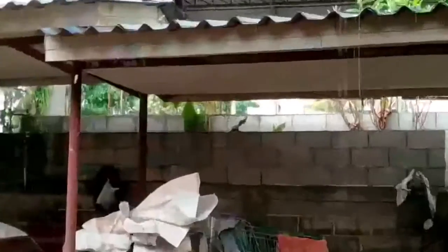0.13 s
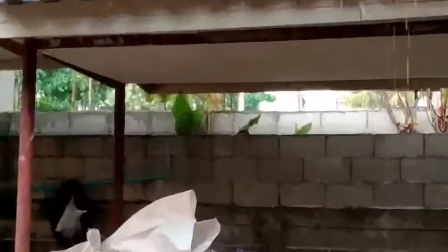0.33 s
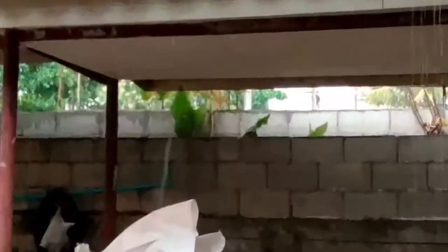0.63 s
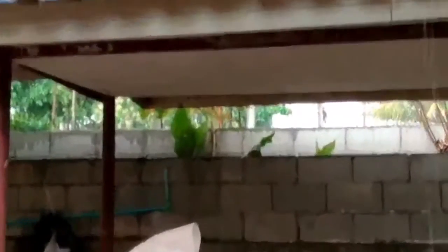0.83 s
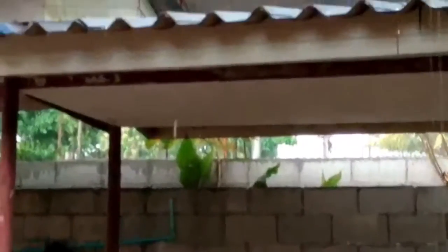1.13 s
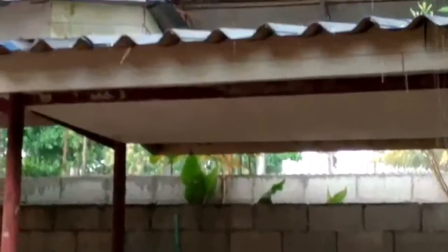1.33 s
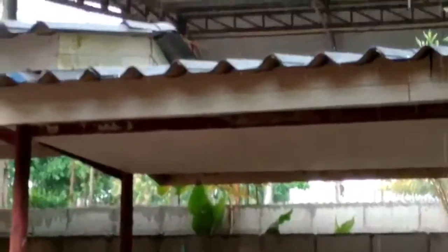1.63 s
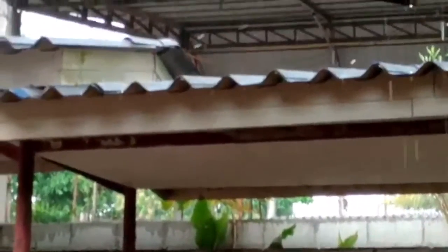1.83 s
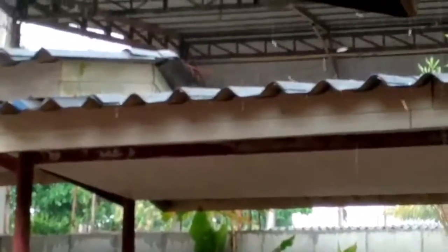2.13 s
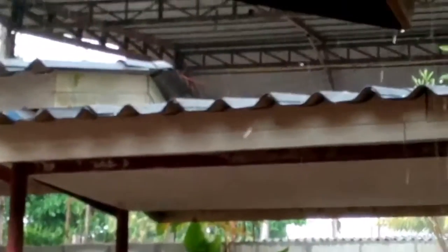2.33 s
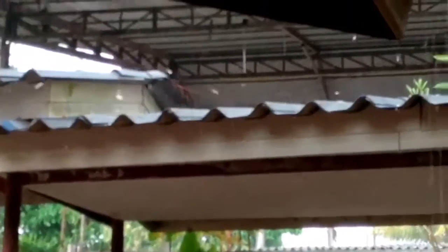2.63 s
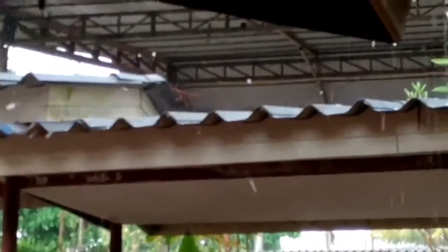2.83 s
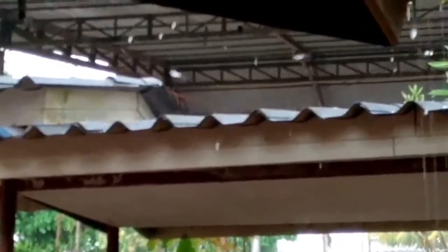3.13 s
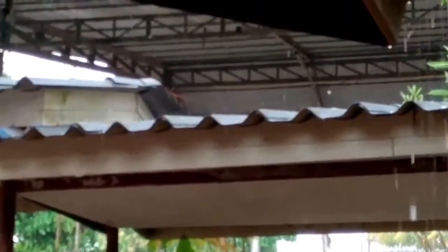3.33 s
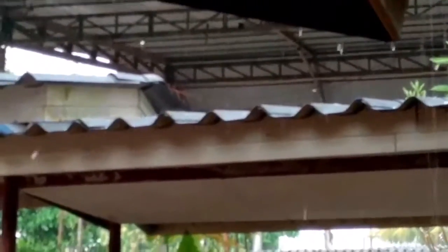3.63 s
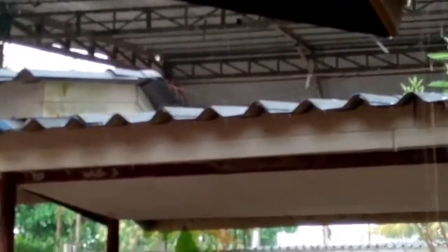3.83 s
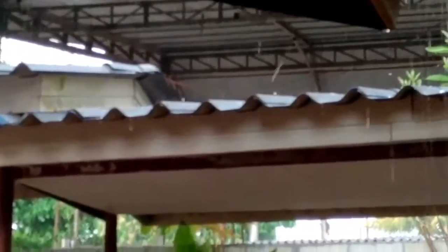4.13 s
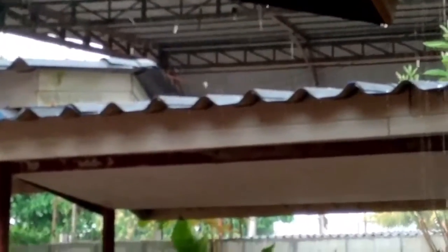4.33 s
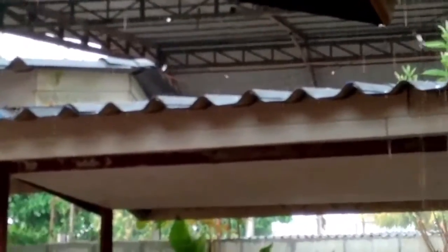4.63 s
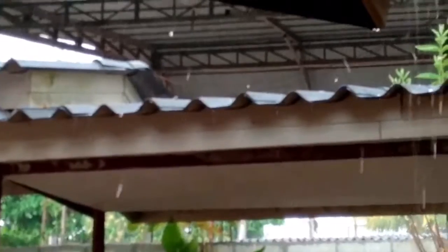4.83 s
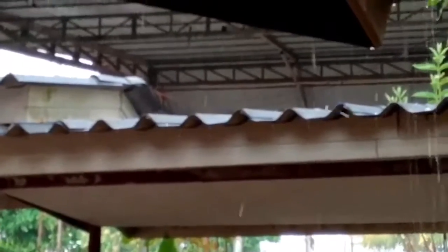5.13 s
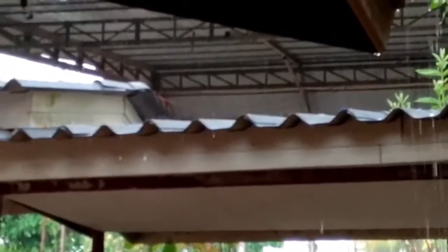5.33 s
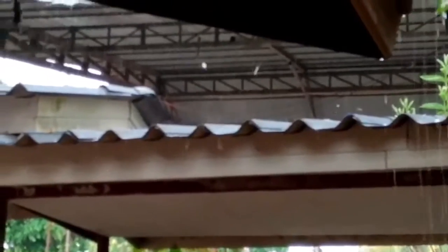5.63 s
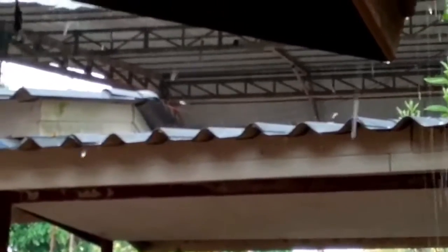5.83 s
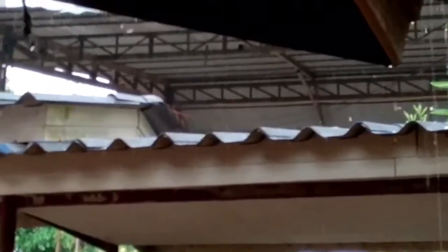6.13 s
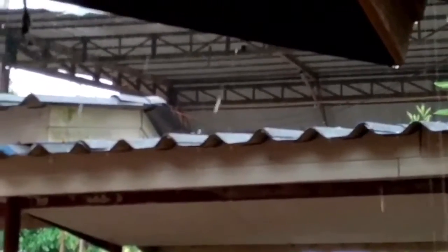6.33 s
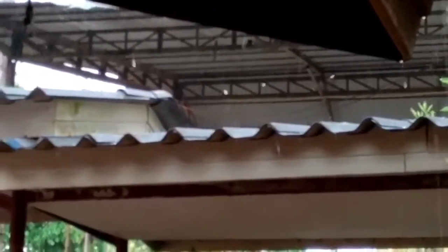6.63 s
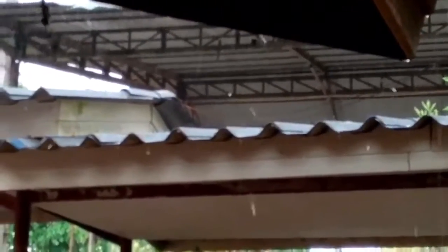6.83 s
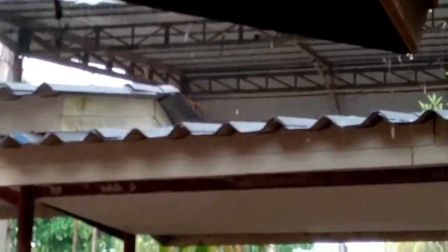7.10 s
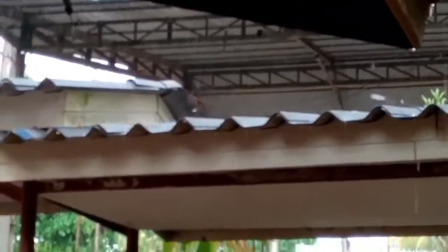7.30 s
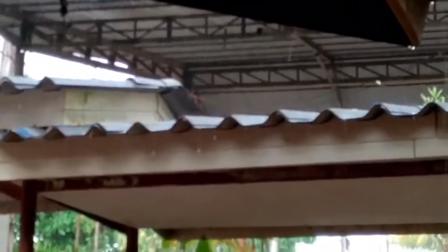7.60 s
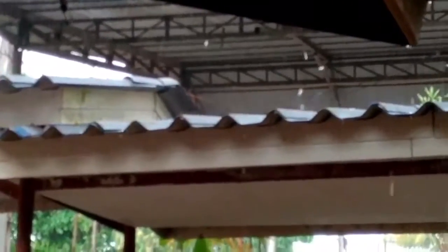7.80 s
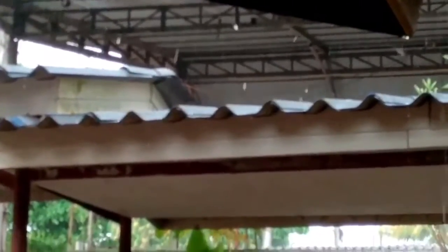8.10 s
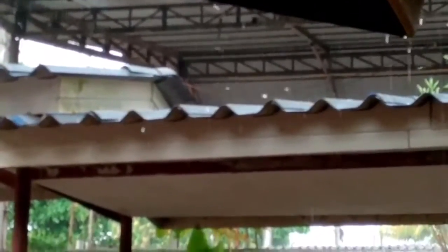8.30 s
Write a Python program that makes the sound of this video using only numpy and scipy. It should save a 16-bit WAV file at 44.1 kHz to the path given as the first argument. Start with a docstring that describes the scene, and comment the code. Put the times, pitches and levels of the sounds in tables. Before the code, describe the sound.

Hail and rain drum steadily on corrugated roofing sheets around an open shelter. A dense, flickering roar runs throughout, filled with tiny dry ticks and short pings. Nearer stones strike irregularly several times a second with hard mid-pitched raps and bright icy cracks, while heavier ones thud dully overhead. The microphone is under the roof, wide stereo, with no deep bass and slightly softened top.

```python
"""An open shelter among corrugated sheet roofs, in hail and rain.
Countless far stones and drops merge into a flickering roar: bands of noise stirred by random blows.
Small stones ping, tick and tonk on patches of sheet, whose panels also hum: struck or shaken resonances.
Near stones give raps and icy cracks, each a short tick and a dying wash of noise round one pitch.
The heaviest land overhead with a dull thud: a push of air, its echoes and a short boom."""
import sys
import numpy as np
from scipy import signal
from scipy.io import wavfile

SR = 44100
rng = np.random.default_rng(int(sys.argv[2]) if len(sys.argv) > 2 else 0)


def wav_out(sig):
    """Save sig, one row per channel (or a flat mono array), as 16-bit PCM at SR to the path in sys.argv[1]."""
    wavfile.write(sys.argv[1], SR, np.round(np.clip(np.atleast_2d(sig).T, -1, 1) * 32767).astype(np.int16))


N = 373086

# How the downpour swells and sags: t/s, base level/dB, treble lift/dB
DOWNPOUR = [(0.0, -25.5, 4.5), (0.2, -23, 1.5), (0.33, -26, 3.5), (0.4, -22.5, 2), (0.62, -25.5, 3),
            (0.88, -25, 0.5), (0.96, -25.5, 2.5), (1.25, -22, -1), (1.62, -24.5, 3.5), (1.71, -28, 2),
            (1.75, -20.5, 1.5), (1.85, -25, 6), (2.08, -23, 0.5), (2.24, -28, 2.5), (2.29, -23.5, 3),
            (2.8, -24, 0.5), (2.949, -21.5, -4.5), (3.32, -25, 3.5), (3.7, -24, 1.5), (4.41, -24.5, 2.5),
            (4.68, -23.5, 3), (5.02, -24.5, 2.5), (5.86, -24.5, 2), (6.25, -22, -1), (6.49, -25, -3),
            (6.55, -23, 0), (7.0, -24.5, 2.5), (7.17, -23, 2.5), (7.8, -24.5, 2.5), (7.86, -19.5, 6),
            (8.04, -24, 4.5), (8.1, -22.5, 0), (8.46, -23.5, 5.5)]
# Tone colour of the rain on the far sheets: f/Hz, relative level per Hz/dB
ROAR_COLOUR = [(28, -40), (50, -23), (110, -8.5), (170, -8), (400, -7.5), (580, -5.5), (770, -6), (1400, 1),
               (2200, -0.5), (2700, -5.5), (3400, -3.5), (4500, -12.5), (6300, -12), (8000, -11),
               (10000, -26.5)]
# How alike the roar is on the left and right: f/Hz, likeness (1 = same, 0 = unrelated, below 0 = opposed)
LEFT_RIGHT_LIKENESS = [(40, .86), (120, 1), (300, 0.93), (700, 0.8), (1400, -0.17), (3000, 0.11),
                       (8000, 0.034)]
# Which side the roar leans to: f/Hz, left minus right/dB
LEFT_RIGHT_LEAN = [(100, 0.5), (700, 0), (1400, 1.5), (2800, 0.5), (5500, -7), (9000, -0.5)]
# Heavy stones overhead, and the low body of the hard rap at 2.488 s: t/s, push level/dB, push f/Hz, boom
# level/dB, boom f/Hz, # clear note against noisy boom/dB, boom t60/s (t60 = time to fall by 60 dB)
HEAVY_STONES = [(1.0655, -1, 960, -21, 205, -12, .2), (1.204, -23, 800, -19, 610, -3, .16),
                (1.3307, -10.5, 710, -23, 455, -8, .14), (1.787, -16, 600, -21, 332, -6, .16),
                (1.797, -23, 700, -20, 594, -4, 0.18), (2.0905, -14, 450, -19.5, 264, 7, 0.09),
                (2.4884, -11, 1500, -28, 800, -5, .06), (2.605, -30, 700, -26, 438, -5, 0.18),
                (2.882, -26, 600, -27, 350, 0, .16), (3.562, -22, 600, -23.5, 457, 9, .2),
                (3.754, -20, 800, -23, 800, -5, 0.18), (4.5136, -8.5, 900, -22, 280, 0, .14),
                (4.6784, -10, 610, -18.5, 263, 1, 0.11), (5.207, -16, 800, -27, 397, -10, .16),
                (5.443, -26, 700, -21, 560, -7, 0.16), (5.455, -28, 600, -26, 372, 0, .1),
                (6.1945, -24, 620, -14, 385, 4, 0.067), (6.561, -23, 800, -24, 724, 1, 0.2),
                (6.8512, -7.5, 1000, -21, 497, -4, 0.088), (6.9185, -11, 890, -22, 480, 3, .06),
                (7.621, -13.5, 700, -26, 384, 0, .16), (7.834, -32, 700, -22.5, 517, 6, 0.18),
                (8.066, -12.5, 810, -28, 835, -5, 0.14)]
# Stones rapping the sheet, plus a few crisp high ticks of cracking ice: t/s, level/dB, ring f/Hz, left minus
# right/dB, ring t60/s, # tick against that level/dB, narrow ring over broad wash/dB
RAPPING_STONES = [(0.118, -9, 1450, 3, 0.15, -15.5, -6), (0.215, -10, 2250, 4, 0.23, -8, 10),
                  (0.402, -9, 1806, -9, .24, -10, 15), (0.502, -19, 1790, -2, 0.22, -2, 0),
                  (0.604, -8, 1344, -4, 0.16, -12, -4), (0.641, -10.5, 2040, 0, 0.69, -9, 3),
                  (0.721, -8, 1770, 0, 0.35, -9, -3), (1.1274, -21, 1770, 1, 0.22, -6, 0),
                  (1.2057, -5.5, 1110, 2, 0.19, -7, 0), (1.314, -11, 1510, -4, 0.2, -6, -9),
                  (1.397, -15, 1720, -5, 0.28, -5, -1), (1.7434, -13, 1330, 0, 0.4, -5, 4),
                  (1.758, -14, 2400, 0, .2, -7, 2), (1.7897, -14, 1800, 5, .15, 3, -4),
                  (1.8108, -9, 2180, -3, 0.18, -6, 0), (1.8109, -13, 4960, -2, .05, 7, 0),
                  (1.8198, -8.5, 1280, 2, 0.36, -6, -8), (1.8385, -22, 1700, 6, 0.16, 0, -2),
                  (1.887, -16, 2190, -1, .2, -4, 2), (2.352, -12, 1900, 3, 0.33, -10, 3),
                  (2.4525, -10, 1980, 2, 0.15, -3, 0), (2.4795, -20, 1790, 0, .08, -4, 5),
                  (2.4884, -3, 1590, 1, 0.12, 0.5, -2), (2.4935, -12, 2100, -2, 0.11, -5, -2),
                  (2.5025, -10, 1800, 0, .08, 0, 0), (2.5358, -13.5, 1820, -4, 0.6, -3, -2),
                  (2.6046, -11, 945, -1, 0.26, -7, 11), (2.689, -11, 1350, 6, 0.28, -6, -11),
                  (2.8665, -18, 1680, 0, 0.23, -1, 0), (2.8835, -9, 1660, 1, 0.35, -10, 0),
                  (2.9208, -11.5, 2120, -1, 0.63, -8, -12), (3.03, -10, 2110, 0, 0.11, 1, -11),
                  (3.14, -6, 1200, 0, 0.21, -3, 5), (3.221, -12, 1380, 1, 0.38, -8, -5),
                  (3.5045, -15, 2730, -3, .2, -6, 3), (3.5585, -15, 5600, -6, .08, -2, 0),
                  (3.559, -6.5, 1980, -5, 0.1, -4, 0), (3.6394, -11.5, 2020, 0, 0.38, -12, -16),
                  (3.7443, -12.5, 1240, 4, 0.58, -14, -10), (3.779, -15, 1380, 1, 0.49, -5, 1),
                  (3.805, -10.5, 2130, -1, 0.22, -2, 10), (4.11, -10, 1700, -2, 0.68, -9, 5),
                  (4.2718, -14, 6250, 1, .04, -1, 6), (4.2718, -6, 3120, -4, 0.074, -3, 3),
                  (4.2765, -6, 3700, -2, 0.066, -7, 4), (4.5847, -11, 2030, -1, 0.25, -2, 0),
                  (4.6275, -8, 1855, -1.5, 0.72, 2.5, 3), (4.7168, -12.5, 1750, 1, .24, -6, -2),
                  (4.769, -13, 2160, 3, 0.67, -6, 1), (4.9167, -7.5, 1620, 1, 0.25, -3, 0),
                  (4.9578, -26, 1530, -3, 0.18, -7, 4), (5.07, -10.5, 1390, 0, 0.33, -8, -10),
                  (5.2129, -7.5, 1700, 2, 0.3, -9, 4), (5.32, -13.5, 2270, 5, 0.29, -8, 1),
                  (5.449, -14, 1510, 0, 0.12, -9, 2), (5.4946, -11.5, 1380, 4, 0.31, -1, -2),
                  (5.5488, -10, 1200, 1, 0.29, -7, -11), (5.589, -6, 1340, -3, .1, -6, -2),
                  (5.5938, -3, 1284, -1, 0.12, -8, 9), (5.595, -14, 2400, 0, .1, -6, 4),
                  (5.7305, -11, 1150, 4, 0.29, -5, -5), (5.892, -12, 1700, 4, 0.81, -3, -1),
                  (5.971, -10, 1350, 2, 0.27, -7, 3), (6.0325, -9, 1790, 2, 0.4, -11, 10),
                  (6.0832, -14, 1300, 3, 0.31, -2, 0), (6.1389, -11, 1470, 5, 0.39, -7, -2),
                  (6.2246, -14.5, 1750, 4, .24, -1, 1), (6.3001, -15.5, 990, 0, 0.6, -10, -16),
                  (6.558, -14, 1380, 6, 0.17, -10, 3), (6.5974, -9, 865, 0, 0.2, -8, 1),
                  (6.677, -10.5, 1440, 2, 0.41, -9, -15), (6.72, -19, 1490, 1, .25, -5, 0),
                  (6.748, -13, 1290, 2, 0.14, 3, -2), (6.869, -10, 1950, 2, .12, -4, 3),
                  (7.0407, -17, 2600, 5, 0.23, -6, 4), (7.095, -12, 1350, 5, .25, -8, -1),
                  (7.1465, -4, 1630, 0, 0.18, -13, -5), (7.18, -22, 1810, 3, 0.15, -5, 2),
                  (7.228, -18, 1280, 4, 0.2, -6, 7), (7.3055, -16, 1720, 6, 0.16, 0, 0),
                  (7.3647, -13, 2240, 4, 0.21, -8, 2), (7.4759, -8.5, 1850, 2, 0.58, -10, 2),
                  (7.5991, -6.5, 1350, 4, 0.33, -10, -5), (7.6205, -16, 1700, 4, 0.17, -4, 1),
                  (7.8305, -13, 2500, -3, 0.091, -8, 8), (7.835, 0, 2620, -3, 0.11, -12, 11),
                  (7.842, -5, 2700, -5, .1, -14, 7), (7.8375, -7.5, 1145, -1, 0.41, -7, 15),
                  (7.884, -24, 1800, 5, 0.18, -5, 2), (7.9353, -8, 1786, 3, 0.53, -10, 4),
                  (8.0635, -8, 1020, -0.5, 0.33, -12, -8)]
# Ice shattering on the sheet: t/s, level/dB, ring f/Hz, left minus right/dB, ring t60/s,
# narrow ring over broad wash/dB
SHATTERING_ICE = [(0.041, -16, 6240, -3.0, 0.27, 12), (0.1108, -15.5, 5970, -3, 0.26, 5),
                  (0.212, -9.5, 6600, -4.0, 0.2, -13), (0.415, -18.5, 6660, -3, 0.85, 9),
                  (0.4785, -14, 4510, -2, 0.19, -4), (0.7555, -14, 4140, -2, 0.31, -6),
                  (0.9948, -13.5, 3800, -2, 0.19, 13), (1.1222, -20.5, 3990, -4, 0.91, -3),
                  (1.301, -17, 6100, -3.0, 0.52, 12), (1.5728, -19, 5500, -1, 0.32, 11),
                  (1.7552, -20.5, 3840, -3, 0.94, -13), (1.8106, -10.5, 5430, -2, 0.18, 6),
                  (2.055, -20, 4280, -5, 0.52, -10), (2.333, -18, 3500, -3.5, 0.28, -8),
                  (2.4524, -17, 3400, -5, 0.26, 7), (2.6616, -13.5, 3950, -3, 0.39, -2),
                  (2.8307, -15.5, 4100, -3, 0.89, 5), (2.876, -15, 5440, 1, 0.4, -6),
                  (2.8953, -13, 5440, -5, 0.22, 2), (2.99, -12, 5840, -6, 0.45, 17),
                  (3.4147, -18, 3580, -4, 0.17, -9), (3.556, -14, 4700, -4, .1, 8),
                  (3.559, -8.5, 5500, -5, 0.11, 17), (3.5645, -14.5, 5270, -4, 0.18, 5),
                  (3.6914, -14.5, 3830, -4, 0.28, -18), (4.077, -14, 6700, -1, 0.24, 8),
                  (4.2716, -7, 6300, 0, .04, 3), (4.276, -14, 6100, -2, 0.067, 3),
                  (4.466, -24, 3430, 1, 0.36, -4), (4.645, -17.5, 5000, -2, 0.33, -4),
                  (5.0569, -18, 3400, -2, 0.67, 3), (5.312, -19.5, 3660, -3, 0.4, 4),
                  (5.441, -19, 5140, -5, 0.17, 7), (5.5928, -15, 3910, -1, 0.25, -4),
                  (6.1518, -21.5, 3490, -2, 0.87, -6), (6.206, -14.5, 6240, -1, 0.87, 7),
                  (6.294, -18.5, 3940, -3, 0.42, -11), (6.7, -20, 3530, -1.5, 0.93, 0),
                  (7.0258, -18, 3600, 0, 0.57, 4), (7.148, -12.5, 3700, 1, 0.31, -2),
                  (7.179, -15, 3610, -1.5, 0.13, -5), (7.439, -17, 3880, -2, 0.94, -19),
                  (7.488, -22, 3500, -2.0, 0.32, -2), (7.615, -12, 3320, -2, 0.28, -11),
                  (8.062, -11, 4600, 0, 0.55, -5), (8.386, -16, 5950, -1, 0.83, 13)]
# Echoes of a push from beams, ground and walls: delay/s, typical level against the push/dB, sign
PUSH_ECHOES = [(.0098, -9, -1), (.0116, -8, -1), (.0300, -11, 1), (.0430, -13, 1)]
# Panel modes, kept humming by the rain: f/Hz, hum level/dB, t60/s
PANEL_MODES = [(105.8, -53.5, 0.15), (205, -53, 0.14), (348.4, -62, 0.34), (1305, -49.5, 0.07)]

BOOM_RISE_S, PUSH_SPREAD_PER_S = .003, 380
NOTE_EXTRA_T60_S = .2   # the note's own fall, on top of the fall of the whole wash
TICK_WIDTH = .45   # first tick filter's width, as a share of the wash width
CRACK_TICK_DB, CRACK_RISE_S = -2, .001   # the same for every crack
DENSITY_FOLLOWS = 1.5   # stones come thicker as the downpour swells: dB of rate per dB of level
MIC_LOW_HZ, MIC_TOP_HZ, CUTOFF_HZ = 42, 9200, 10280
LEFT_RIGHT = np.array([[1], [-1]])   # plus on the left, minus on the right


def from_db(db):
    """Turns decibels into gain."""
    return 10 ** (np.asarray(db) / 20)


def rms_one(x):
    """Scales a sound to an average (rms) strength of 1."""
    return x / np.sqrt(np.mean(x ** 2) + 1e-20)


def at_hz(points, hz):
    """Reads a table at any pitch, on a log-frequency axis."""
    table_hz, values = np.array(points).T
    return np.interp(np.log(hz), np.log(table_hz), values)


def resonance(x, hz, width_hz):
    """Two-pole filter that favours one pitch, with a gain of about 1 at its top."""
    r = np.exp(-np.pi * width_hz / SR)
    top_gain = (1 - r * r) / 2
    poles = [1, -2 * r * np.cos(2 * np.pi * hz / SR), r * r]
    return signal.lfilter(top_gain * np.array([1, 0, -1]), poles, x)


def ring(clicks, hz, t60):
    """Each unit click starts a sine of height 1 that dies away, like one mode of a struck sheet."""
    r = from_db(-60 / (t60 * SR))
    w = 2 * np.pi * hz / SR
    return signal.lfilter([0, np.sin(w)], [1, -2 * r * np.cos(w), r * r], clicks + 1e-18)


def add(out, s, sound):
    """Mixes a stereo sound in at s seconds."""
    i = round(s * SR)
    out[:, i:i + sound.shape[1]] += sound[:, :N - i]


def downpour():
    """Base level and treble lift in dB, sample by sample, on straight lines between table points."""
    s, *columns = np.transpose(DOWNPOUR)
    return [np.interp(np.arange(N) / SR, s, column) for column in columns]


def blows(per_s, spread_db, t60):
    """Power of random blows of uneven size, each dying away; scaled to a mean of 1."""
    run_in = SR // 2   # blows before the start are already dying away at t = 0
    sizes = from_db(2 * spread_db * np.minimum(rng.exponential(1, N + run_in), 4))
    struck = sizes * (rng.random(N + run_in) < per_s / SR)
    fall_per_sample = from_db(-120 / (t60 * SR))   # doubled dB, since this is power
    power = signal.lfilter([1], [1, -fall_per_sample], struck)[run_in:]
    return power / power.mean()


def roar(per_s, spread_db, t60, shared, common, wash):
    """Far sheets: many impacts blur into noise bands, stirred by own and shared blows over a smooth wash."""
    level_db, treble_db = downpour()
    edges = 25 * 2 ** (np.arange(28) / 3)   # third-octave bands, in Hz
    white = rng.standard_normal((2, 2, N))
    group_blows = [blows(per_s, spread_db, t60) for _ in range(3)]
    own_blows = blows(per_s, spread_db, t60)
    common_blows = blows(per_s, spread_db, t60)
    out = 0
    for k, (low, high) in enumerate(zip(edges, edges[1:])):
        band_filter = signal.butter(2, [low, high], "band", fs=SR, output="sos")
        mid, side = signal.sosfilt(band_filter, white[k % 2])
        hz = np.sqrt(low * high)
        # mixing mid and side sets how alike left and right are
        alike = np.clip(at_hz(LEFT_RIGHT_LIKENESS, hz), -.99, .99)
        band = np.sqrt(1 + alike) * mid + np.sqrt(1 - alike) * side * LEFT_RIGHT
        # four neighbouring bands share a group; each band reads the own blows at another time
        group = group_blows[k // 4 % 3]
        own = np.roll(own_blows, k * N // 27)
        stirred = np.sqrt(wash + common * common_blows + shared * group + own)
        # the treble lift starts above 2400 Hz and is full an octave higher
        colour_db = treble_db * np.clip(np.log2(hz / 2400), 0, 1)
        lean = from_db(at_hz(LEFT_RIGHT_LEAN, hz) / 2 * LEFT_RIGHT)
        out = out + from_db(at_hz(ROAR_COLOUR, hz) + colour_db) * stirred * lean * band
    return from_db(level_db) * rms_one(out)


def patter(per_s, spread_db, cycles, low_hz, high_hz, level_db, across, count):
    """Small stones, each setting one patch of sheet ringing; cycles is how many waves a 60 dB fall takes."""
    pour_db = downpour()[0]
    thick = from_db(DENSITY_FOLLOWS * (pour_db - pour_db.mean()))
    sizes = from_db(spread_db * np.minimum(rng.exponential(1, N), 4)) * rng.choice([-1, 1], N)
    hits = rng.random(N) < per_s * thick / SR
    struck = sizes * hits / np.sqrt(thick)   # the level is applied at the end
    patch = rng.integers(0, count, N)
    out = np.zeros((2, N))
    for k, hz in enumerate(np.geomspace(low_hz, high_hz, count)):
        ping = rms_one(ring(struck * (patch == k), hz, cycles / hz))
        ping = ping * from_db(at_hz(ROAR_COLOUR, hz)) * np.sqrt(hz)
        # patches take turns on the left and right, and reach the other side slightly shifted
        out[k % 2] += ping
        out[1 - k % 2] += across * np.roll(ping, rng.integers(-20, 20))
    return from_db(level_db + pour_db) * rms_one(out)


def hum():
    """Steady random shaking never lets the panel modes come to rest."""
    shaking = rng.standard_normal((len(PANEL_MODES), N))
    return sum(from_db(db) * rms_one(ring(x, hz, t60))
               for x, (hz, db, t60) in zip(shaking, PANEL_MODES))


def stones(table, rise_s, narrow, wide, first_t60, tail_db, note_db, wash_db):
    """A tick, then the sheet's crowded modes as dying noise: a quick first fall and a longer tail."""
    out, t = np.zeros((2, N)), np.arange(SR // 3) / SR
    for s, db, hz, pan_db, t60, tick_db, focus_db in table:
        noise = rng.standard_normal((2, len(t)))
        # the mode nearest the blow sounds as a note
        note_sine = np.sin(2 * np.pi * (hz * t + rng.random((2, 1))))
        note = from_db(note_db + focus_db - 60 * t / NOTE_EXTRA_T60_S) * note_sine
        narrow_ring = note + rms_one(resonance(noise, hz, narrow * hz))
        focused = from_db(focus_db) * narrow_ring / np.hypot(1, from_db(note_db + focus_db))
        broad = rms_one(resonance(resonance(noise, hz, wide * hz), hz, 2 * wide * hz))
        wash = (focused + broad) / (1 + from_db(focus_db))
        tail = from_db(tail_db - 60 * t / np.clip(t60, .03, .8))
        shape = (from_db(-60 * t / first_t60) + tail) * (1 - np.exp(-t / rise_s))
        # the tick is one click through two broad resonances
        click = resonance(1.0 * (t == 0), hz, TICK_WIDTH * wide * hz)
        tick = resonance(click, hz, 1.1 * wide * hz)
        sound = from_db(wash_db) * wash * shape + from_db(tick_db) * tick / np.abs(tick).max()
        add(out, s, from_db(db + pan_db / 2 * LEFT_RIGHT) * sound)
    return out


def cracks():
    """Shattering ice: a fast start excites high, broadly spread sheet modes."""
    table = [(*row, CRACK_TICK_DB, focus_db) for *row, focus_db in SHATTERING_ICE]
    return stones(table, rise_s=CRACK_RISE_S, narrow=0.27, wide=1.43, first_t60=0.0049,
                  tail_db=6.5, note_db=-16.0, wash_db=-11)


def raps():
    """Near stones: a softer start and narrower resonances make the sheet's pitch clearer."""
    return stones(RAPPING_STONES, rise_s=0.0027, narrow=0.091, wide=1.0, first_t60=0.0034,
                  tail_db=4.5, note_db=-1.5, wash_db=-12.0)


def thuds(damping, narrow, wide_db, side_db, panel_db):
    """The dented panel pushes and pulls the air, with echoes, and its low modes boom on."""
    out, t = np.zeros((2, N)), np.arange(SR // 4) / SR
    for s, push_db, hz, boom_db, boom_hz, note_db, boom_t60 in HEAVY_STONES:
        # the bending wave spreads: highs come first, lows trail
        push = np.sin(2 * np.pi * hz * t / (1 + PUSH_SPREAD_PER_S * t)) * np.exp(-damping * hz * t)
        noise = rng.standard_normal((2, len(t)))
        narrow_noise = rms_one(resonance(noise, boom_hz, narrow * boom_hz))
        wide_noise = rms_one(resonance(noise, 450, 980))
        mid, side = narrow_noise + from_db(wide_db) * wide_noise
        # the dented bay rings at its own pitch
        note = from_db(note_db) * np.sin(2 * np.pi * boom_hz * t)
        boom = rms_one(note + mid + from_db(side_db) * side * LEFT_RIGHT)
        shape = from_db(boom_db - 60 * t / max(boom_t60, .03)) * (1 - np.exp(-t / BOOM_RISE_S))
        # each blow also rings the panel modes, a little differently every time
        modes = sum(from_db(db + panel_db + rng.normal(0, 2.3)) * ring(1.0 * (t == 0), f, t60)
                    for f, db, t60 in PANEL_MODES)
        add(out, s, from_db(push_db) * (push - modes) + boom * shape)
        for late_s, echo_db, sign in PUSH_ECHOES:
            echo_gain = from_db(push_db + echo_db + rng.normal(0, 3.4, (2, 1)))
            add(out, s + late_s, sign * echo_gain * push)
    # a panel this size radiates no deep bass
    return signal.sosfilt(signal.butter(2, 85, "high", fs=SR, output="sos"), out)


def scene():
    """Adds up roar, pings, dry ticks, low tonks, hum, cracks, raps and thuds."""
    far = from_db(0.5) * roar(per_s=81.0, spread_db=5.5, t60=0.46, shared=0.59, common=0.8, wash=0.94)
    pings = patter(per_s=300.0, spread_db=3.0, cycles=120.0, low_hz=400, high_hz=5200,
                   level_db=-7.5, across=.3, count=28)
    ticks = patter(per_s=1000.0, spread_db=3.0, cycles=16.0, low_hz=900, high_hz=7240,
                   level_db=-5, across=.3, count=20)
    tonks = patter(per_s=40.0, spread_db=3.5, cycles=35.0, low_hz=119.8, high_hz=745,
                   level_db=-19.5, across=0.95, count=10)
    knocks = thuds(damping=0.99, narrow=0.2, wide_db=-1.5, side_db=-7.0, panel_db=30.0)
    return far + pings + ticks + tonks + hum() + cracks() + raps() + knocks


def record(dry):
    """The microphone rolls off at both ends, then a steep filter cuts the top."""
    mic_filter = signal.butter(3, [MIC_LOW_HZ, MIC_TOP_HZ], "band", fs=SR, output="sos")
    dulled = signal.sosfilt(mic_filter, dry)
    # 70 dB down from the cutoff upwards
    return signal.sosfilt(signal.cheby2(20, 70, CUTOFF_HZ, fs=SR, output="sos"), dulled)


dry = scene()
out = record(dry)
wav_out(out)
```